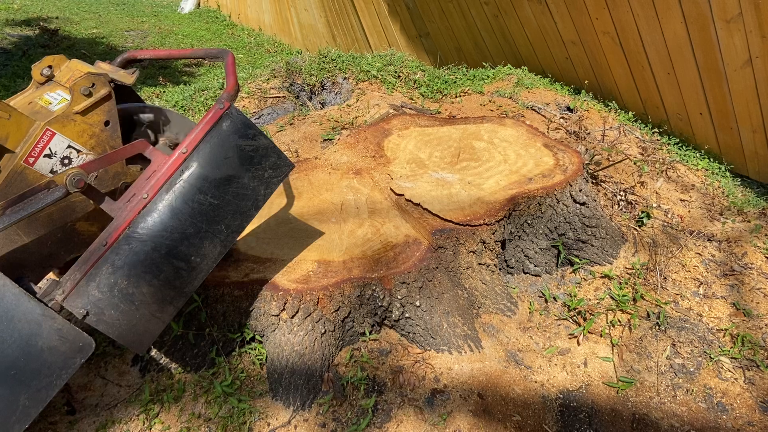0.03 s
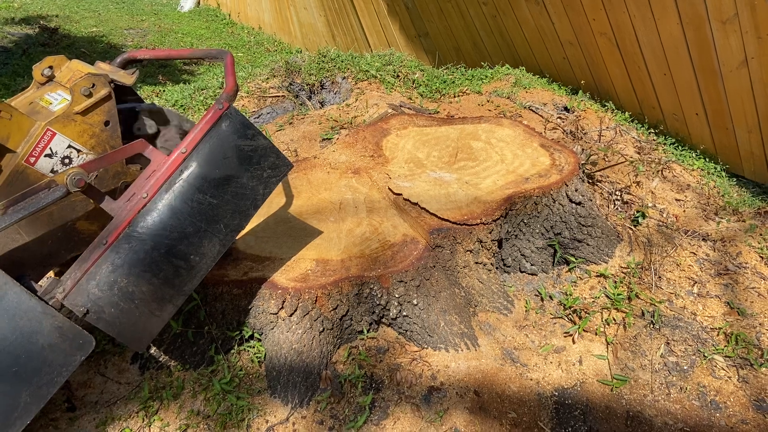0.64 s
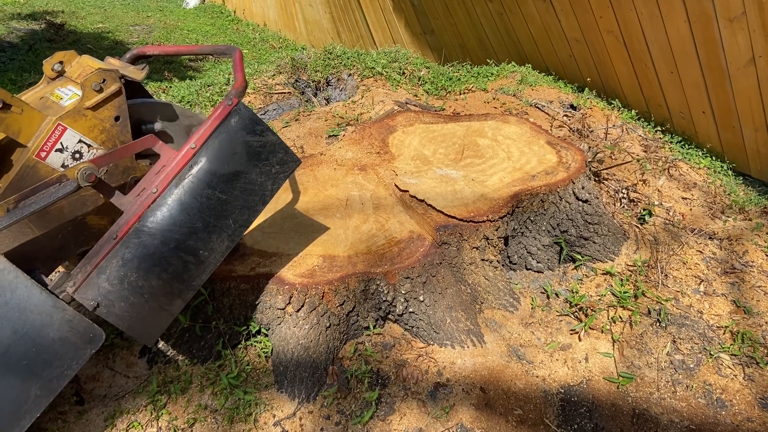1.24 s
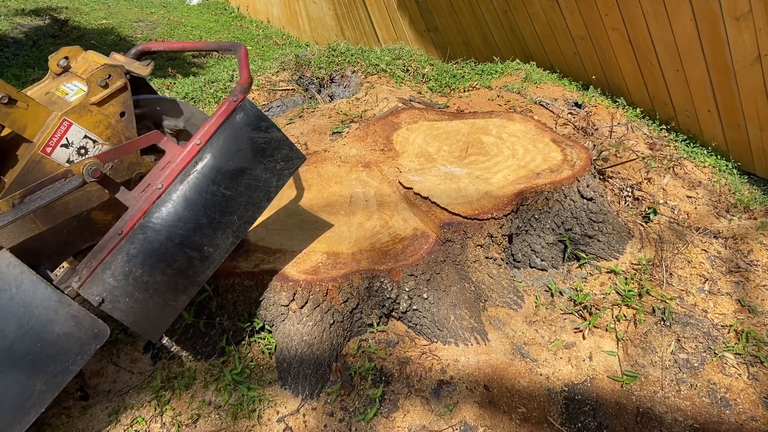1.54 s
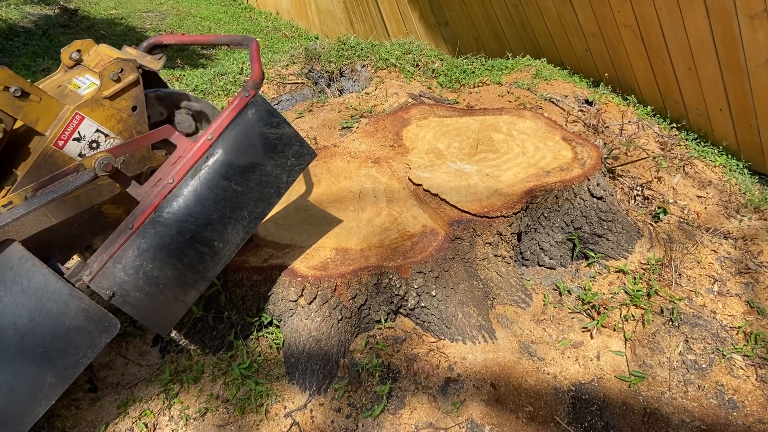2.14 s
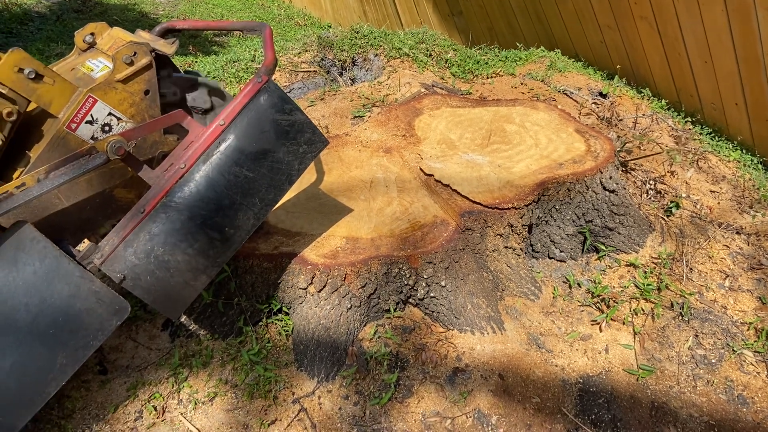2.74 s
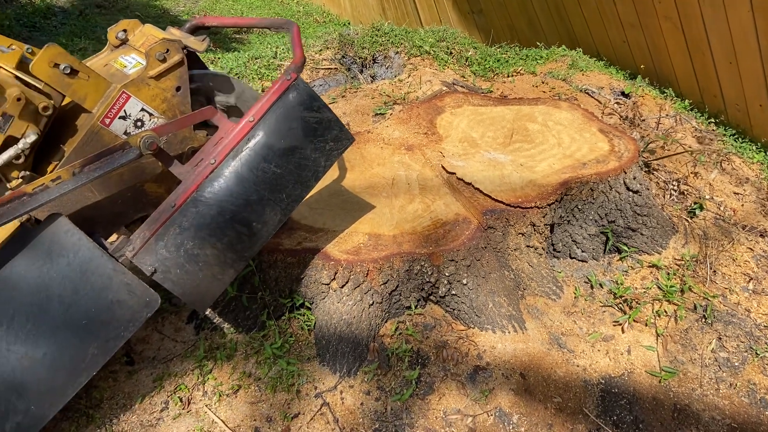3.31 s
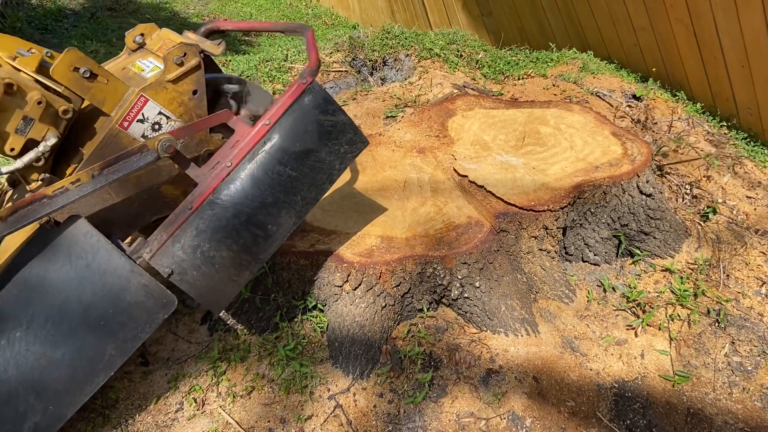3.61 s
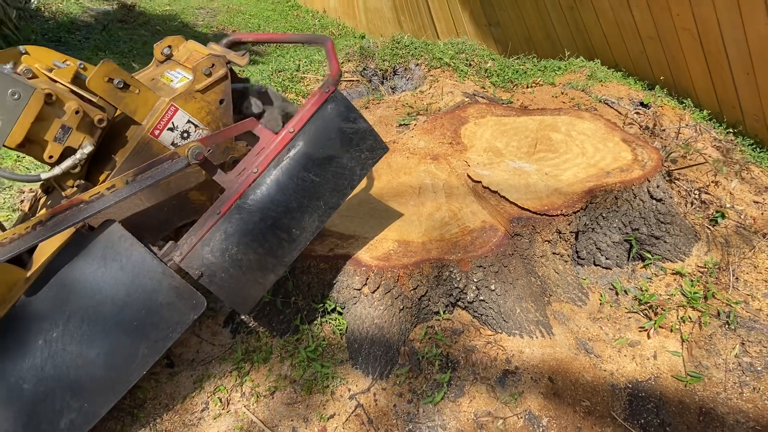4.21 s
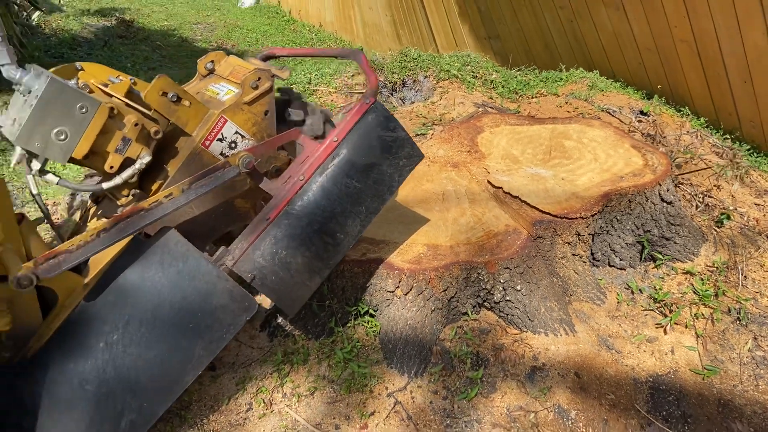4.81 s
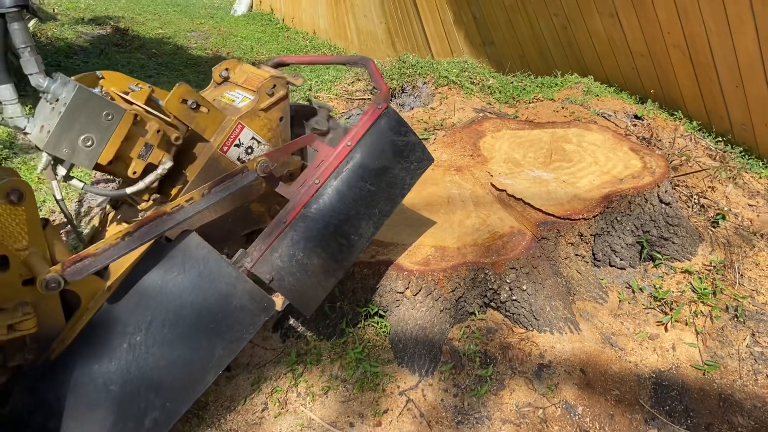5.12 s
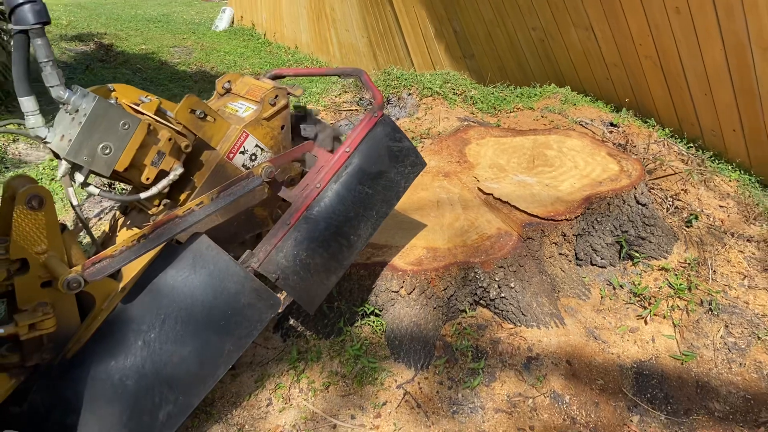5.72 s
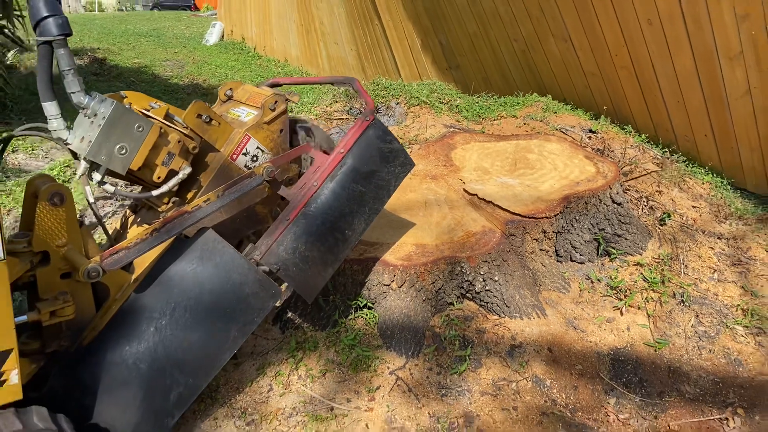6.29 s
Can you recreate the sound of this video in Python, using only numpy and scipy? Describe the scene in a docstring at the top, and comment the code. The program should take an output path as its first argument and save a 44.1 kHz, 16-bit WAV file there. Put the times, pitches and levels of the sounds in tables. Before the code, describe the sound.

A stump grinder's diesel engine idles outdoors for about six and a half seconds, holding the same speed throughout. A low exhaust drone and rumble carry a fast, even knocking that sets the metal panels ringing and buzzing. A hydraulic pump hums with a throb about three times a second, and the cooling fan adds a hum and a faint hiss. Loose fittings give short high ticks and raspy clinks, and a steel guard rings with a thin tone that swells now and then, around 1 second, between 2 and 3.6 seconds, and again near 6 seconds. The sound drops out for a tiny instant at about 2.1 seconds. From around 4 seconds the microphone is slightly closer to the machine, and the ticks and clinks become a little louder and more frequent up to the end.

```python
"""Outdoors, beside a stump grinder whose four-cylinder diesel idles at about 1000 rpm.
The exhaust drones, a nine-piston hydraulic pump hums, the fan hums and hisses, the frame rumbles.
Every firing knocks on the block and sets panels, a guard, the valve cover and loose fittings ringing.
The microphone drifts a little closer to the machine; the sound cuts out once for an instant."""
import sys
import numpy as np
from scipy import signal
from scipy.fft import rfft, irfft
from scipy.io import wavfile
from scipy.ndimage import uniform_filter1d

SR = 44100
rng = np.random.default_rng(int(sys.argv[2]) if len(sys.argv) > 2 else 0)


def transcribe(u):
    """Save the signal u as a 16-bit wav file named by the first command-line argument.

    u: samples, shape (n,) or (channels, n), limited to [-1, 1]; the rate is SR.
    q: integer samples, one column per channel.
    """
    v = np.clip(np.atleast_2d(u).T, -1, 1)
    q = np.round(v * 32767).astype(np.int16)
    wavfile.write(sys.argv[1], SR, q)


N = 288855
TIME_S = np.arange(N) / SR
BINS_HZ = np.maximum(np.arange(N // 2 + 1) * SR / N, 1)
SHAFT_HZ, FIRST_FIRING_S = 16.835, .0576

# firings of one two-turn cycle: (lateness [s], block knock [dB], valve cover kick [dB])
CYLINDERS = [(0.0009, 9, -5.5), (0.0017, 7, -3.5), (0.0023, 8.5, -8), (0.005, 7, -2.5)]


def from_db(db):
    """Decibels to gain."""
    return 10 ** (np.asarray(db) / 20)


def unit_rms(x):
    """Scale to rms 1."""
    return x / np.sqrt(np.mean(x ** 2) + 1e-20)


def at_time(points):
    """Read a table at every sample."""
    return np.interp(TIME_S, *np.transpose(points))


def at_bins(points):
    """Read a table at every FFT bin, on a log-frequency axis."""
    hz, value = np.transpose(points)
    return np.interp(np.log(BINS_HZ), np.log(hz), value)


def drift(rate_hz):
    """Low-passed noise, rms 1."""
    return unit_rms(irfft(rfft(rng.standard_normal(N)) / (1 + (BINS_HZ / rate_hz) ** 2), N))


def colour(x, spectrum):
    """Shape white excitation to a spectral density in dB."""
    return irfft(rfft(unit_rms(x)) * from_db(at_bins(spectrum)) * np.sqrt(SR / 2), N)


def decay(clicks, decay_s):
    """Exponential tail on each click."""
    return signal.lfilter([1], [1, -np.exp(-1 / (decay_s * SR))], clicks)


def walk_gain(walk_db):
    """A source changes by walk_db over the microphone's whole path; gain 1 halfway."""
    # microphone position: (time [s], share of path [0-1])
    walk = [(0, 0.6), (1.5, 0.42), (3, 0.7), (4, 0.72), (5.2, 1), (6.55, 0.98)]
    return from_db(walk_db * (at_time(walk) - .5))


def resonance(x, hz, width_hz):
    """One ringing mode, rms 1."""
    radius = np.exp(-np.pi * width_hz / SR)
    poles = [1, -2 * radius * np.cos(2 * np.pi * hz / SR), radius ** 2]
    return unit_rms(signal.lfilter([1, 0, -1], poles, x))


def ring(x, modes):
    """Parallel modes, each at its own level."""
    return sum(from_db(db) * walk_gain(walk_db) * resonance(x, hz, width_hz)
               for hz, width_hz, db, walk_db in modes)


def tones(turns, orders, waver):
    """Lines locked to a rotation; higher orders waver more in level."""
    total = np.zeros(N)
    for order, db, walk_db in orders:
        gain = from_db(db) * walk_gain(walk_db) * (1 + waver * np.sqrt(order) * drift(6.2))
        total += np.sqrt(2) * gain * np.cos(2 * np.pi * (order * turns + rng.random()))
    return total


def chatter(turns, repeat):
    """Dense small contacts, rows (direct, scattered); the share `repeat` recurs every cycle."""
    size = int(2 * SR / SHAFT_HZ)
    place_in_cycle = (turns / 2 % 1 * size).astype(int) % size
    pattern = rng.standard_normal((2, size))[:, place_in_cycle]
    return np.sqrt(repeat) * pattern + np.sqrt(1 - repeat) * rng.standard_normal((2, N))


def double_hits(start_s, level_db, spread_db, gap_s, second_db):
    """Impulse pairs of random size, the second hit gap_s after the first."""
    hits = np.zeros(N)
    for when_s, db in [(start_s, level_db), (start_s + gap_s, level_db + second_db)]:
        sample = np.clip((when_s * SR).astype(int), 0, N - 1)
        hits[sample] = from_db(db + rng.normal(0, spread_db, len(sample)))
    return hits


def blows(turns, cylinder_db, decay_s, slap_db, spread_db):
    """Force envelope: a sharp blow per firing, then the piston's slap."""
    firing = np.arange(-2, int(2 * turns[-1]) + 1)
    cylinder = firing % len(CYLINDERS)
    start_s = np.interp(firing / 2, turns, TIME_S) + np.array(CYLINDERS)[cylinder, 0]
    slap_s = .007 * rng.normal(1, .31, len(firing))
    hits = double_hits(start_s, cylinder_db[cylinder], spread_db, slap_s, slap_db)
    return np.sqrt(decay(hits ** 2, decay_s / 2) + 1e-12)   # blows add in power


def taps(turns, cylinder, spread_db, bounce_s, bounce_db):
    """One hard contact and its bounce per cycle, at the given cylinder's firing."""
    firing = np.arange(cylinder, int(2 * turns[-1]) + 1, len(CYLINDERS))
    start_s = np.interp(firing / 2, turns, TIME_S) + CYLINDERS[cylinder][0]
    gap_s = bounce_s * rng.normal(1, .28, len(firing))
    return double_hits(start_s, 0, spread_db, gap_s, bounce_db) + 1e-18


def sustained(force, floor_db):
    """Metal never rests between blows: add a floor relative to the rms force."""
    return np.sqrt(force ** 2 + np.mean(force ** 2) * from_db(floor_db) ** 2)


def cooling_air():
    """Hiss of the fan's air, roughened by turbulence."""
    # (frequency [Hz], density [dB])
    spectrum = [(100, -70), (1000, -68), (3000, -79), (6000, -85), (8000, -83.5), (11000, -82),
                (16000, -88.5)]
    grit_db = 1.2 * drift(120)
    return colour(rng.standard_normal((2, N)), spectrum) * walk_gain(1.3) * from_db(grit_db)


def fan_hum(rate_hz=91.65):
    """The belt-driven fan hums off the engine's beat."""
    # (multiple of rate, level [dB], walk [dB])
    orders = [(1, -46, 8), (2, -41, 10.4)]
    return tones(rate_hz * TIME_S, orders, waver=.25)


def frame_rumble(turns):
    """Frame and guards shake harder after each firing."""
    # (frequency [Hz], density [dB])
    spectrum = [(20, -70), (36, -67), (55, -50), (105, -46.5), (150, -53.5), (200, -51.5), (260, -48.5),
                (330, -48.5), (410, -53.5), (520, -52.5), (650, -50.5), (790, -52.5), (950, -58.5),
                (1400, -55), (3000, -144)]
    push = 1 + .1 * np.cos(2 * np.pi * (2 * turns - .23))
    gain = from_db(-2 + drift(12)) * walk_gain(1.5)
    return gain * colour(chatter(turns, repeat=.18) * push, spectrum)


def noise_swells(turns):
    """Narrow bands of noise swell and fade, from low rumble to brief high zings."""
    # (time [s], half length [s], frequency [Hz], width [Hz], level [dB])
    swells = [(0.357, 0.055, 4700, 240, -37.5), (0.629, .006, 800, 400, -25),
              (1.277, 0.067, 372, 70, -25.5), (3.854, 0.81, 243, 50.6, -27.5),
              (4.298, 0.2, 2315, 45, -35.5), (4.9, 0.56, 206, 50, -36.5), (5.235, 0.027, 4750, 350, -33),
              (5.35, 0.36, 105, 35, -29.5), (5.42, 0.18, 4840, 200, -46), (6.1, 0.77, 1030, 200, -40),
              (6.268, 0.19, 260, 200, -35)]
    noise = chatter(turns, repeat=.1)
    return sum(from_db(db) * np.exp(-((TIME_S - at_s) / half_s) ** 2) * resonance(noise, hz, width_hz)
               for at_s, half_s, hz, width_hz, db in swells)


def fitting_ticks(decay_s=.018):
    """A fitting is thrown against its seat: one short rough ring each time."""
    # (time [s], frequency [Hz], level [dB])
    ticks = [(.713, 5000, -34), (1.247, 5540, -43), (1.545, 4900, -39), (2.018, 4410, -38),
             (2.258, 4830, -34), (2.376, 4900, -32), (2.497, 4770, -34), (2.565, 4850, -38),
             (3.327, 4900, -36), (3.662, 4850, -33), (4.635, 4900, -30), (4.871, 4850, -34),
             (4.99, 4850, -35), (5.196, 4650, -35), (5.347, 4800, -34), (5.434, 5000, -31),
             (5.467, 4900, -32), (5.522, 4870, -33), (5.585, 4860, -34), (5.7345, 4600, -32),
             (5.824, 4850, -37), (6.18, 4870, -31), (6.327, 4700, -36), (6.415, 4850, -31)]
    contact = rng.standard_normal((2, N))
    total = np.zeros((2, N))
    for at_s, hz, db in ticks:
        envelope = (TIME_S >= at_s) * np.exp(-np.minimum(abs(TIME_S - at_s) / decay_s, 20))
        total += from_db(db) * envelope * resonance(contact, hz, width_hz=150)
    return total


def fitting_jingle(force, touches_per_s=160, spread_db=1):
    """Loose fittings touch at random, most often just after a knock."""
    # (frequency [Hz], width [Hz], level [dB], walk [dB])
    modes = [(4240, 67, -47.5, -8), (4500, 35, -49, 0), (4730, 29, -51, 6), (4854, 31, -47, 4),
             (5100, 91, -48, 1)]
    touches = rng.random(N) < touches_per_s / SR * force ** 2 / np.mean(force ** 2)
    sizes = from_db(spread_db * rng.standard_normal(N))
    contacts = touches * sizes * rng.choice([-1, 1], (2, N)) + 1e-18
    soften = signal.butter(4, 6000, fs=SR, output="sos")
    return ring(signal.sosfilt(soften, contacts), modes)


def tappet(turns):
    """A tappet ticks once a cycle, on the third firing."""
    # (frequency [Hz], width [Hz], level [dB], walk [dB])
    modes = [(2420, 90, -49, 0), (2550, 70, -45.5, 0), (2665, 80, -48.5, 0)]
    # the tick comes and goes: (time [s], gain [dB])
    gain_db = [(0, 0), (.9, 0), (1.1, -4), (2.1, -4), (2.5, -1), (3.2, -1), (3.45, -8), (4.15, -8),
               (4.3, 1), (4.8, 1), (5.05, -7), (5.4, 2), (5.8, 0), (6.3, -7)]
    strikes = taps(turns, cylinder=2, spread_db=.7, bounce_s=.004, bounce_db=0)
    contact = chatter(turns, repeat=.22) * decay(strikes, decay_s=.006)
    return ring(contact, modes) * from_db(at_time(gain_db))


def valve_snaps(turns, spread_db=2.5):
    """Injectors and valves crack shut at the same points of every cycle."""
    # (delay in cycle [s], level [dB])
    closings = [(.0005, 0), (.014, -4), (.0318, -3), (.041, -5), (.062, -5), (.067, -3), (.08, -6),
                (.09, -5)]
    # (frequency [Hz], density [dB])
    spectrum = [(400, -93), (1050, -65), (1500, -59.5), (1900, -68), (2600, -79.5), (5000, -86),
                (7000, -114), (11000, -84), (16000, -111)]
    cycle_s = np.interp(np.arange(0, turns[-1], 2), turns, TIME_S)
    clicks = np.zeros(N + SR)
    for delay_s, db in closings:
        sample = ((cycle_s + delay_s) * SR).astype(int)
        clicks[sample] = from_db(rng.normal(db, spread_db, len(sample)))
    envelope = decay(clicks[:N] + 1e-18, decay_s=.003)
    return colour(chatter(turns, repeat=.53) * envelope, spectrum)


def cover_buzz(turns):
    """All four cylinders keep the valve cover buzzing."""
    # (frequency [Hz], width [Hz], level [dB], walk [dB])
    modes = [(3226, 13, -46, 2), (3322, 6.3, -43, -1), (3466, 42, -53.5, 11)]
    force = blows(turns, np.array(CYLINDERS)[:, 2], decay_s=.011, slap_db=-1, spread_db=.6)
    return ring(chatter(turns, repeat=.55) * sustained(force, floor_db=-9), modes)


def cover_clink(turns, rise_s=.004, spread_hz=85):
    """The first cylinder rattles the valve cover in a short raspy clink."""
    # (time [s], level [dB], centre [Hz])
    clink = [(0, -38, 3290), (.18, -39, 3290), (.3, -33, 3290), (.42, -32, 3290), (.53, -39, 3290),
             (.72, -33, 3290), (.9, -38, 3290), (1.13, -36.5, 3290), (1.28, -32, 3310), (1.6, -33.5, 3300),
             (2.45, -36, 3280), (2.8, -32, 3290), (3.3, -32.5, 3280), (4.3, -30, 3370), (4.7, -28.5, 3340),
             (4.85, -30.5, 3280), (5.3, -28.5, 3290), (5.5, -30, 3290), (5.8, -28, 3310),
             (6.1, -28.5, 3330), (6.26, -30, 3465), (6.5, -27.5, 3450)]
    at_s, level_db, centre_hz = np.transpose(clink)
    strikes = taps(turns, cylinder=0, spread_db=.5, bounce_s=.008, bounce_db=-1)
    envelope = decay(decay(strikes, rise_s), rise_s) * np.e / (rise_s * SR)   # unit hit peaks at 1
    pitch_hz = np.interp(TIME_S, at_s, centre_hz) + spread_hz * drift(157)
    rasp = np.sqrt(2) * np.sin(2 * np.pi * np.cumsum(pitch_hz) / SR) * (.8 + .35 * drift(300))
    return rasp * envelope * from_db(np.interp(TIME_S, at_s, level_db))


def steel_guard(knock, even_s=.025, flutter_db=2):
    """A lightly damped plate, kept ringing by the knocks, swells now and then."""
    # (time [s], half length [s], gain [dB])
    swells = [(1.01, 0.035, 6), (1.897, .06, 8), (2.223, 0.054, 6.5), (2.395, .05, -2), (2.6, 0.07, 5),
              (2.797, 0.054, 6), (2.98, 0.055, 1), (3.16, .07, 4.5), (3.337, .05, 7), (3.586, 0.064, 8),
              (5.167, 0.044, 0), (5.423, 0.093, 1), (6.008, 0.038, 11.5), (6.18, 0.038, 8)]
    tone = resonance(knock, hz=2097, width_hz=28)
    power = uniform_filter1d(tone ** 2, size=int(even_s * SR))
    even_tone = tone / np.sqrt(power + .21)
    swell_db = sum(db * np.exp(-((TIME_S - at_s) / half_s) ** 2) for at_s, half_s, db in swells)
    return even_tone * from_db(-38 + swell_db + flutter_db * drift(19)) * walk_gain(1.5)


def hydraulic_pump(turns):
    """Nine pistons: a fundamental throbbing about three times a second, and wavering overtones."""
    # fundamental: (time [s], level [dB])
    throb_db = [(0.05, -33), (0.14, -28.5), (0.35, -34), (0.5, -26), (0.6, -49), (0.73, -26), (0.84, -35),
                (0.91, -45), (0.97, -36), (1.05, -29.5), (1.23, -36), (1.27, -32), (2.29, -30.5),
                (2.42, -28), (2.54, -40), (2.67, -27), (2.83, -33), (3.0, -27), (3.1, -32.5), (3.23, -28.5),
                (3.84, -32), (3.88, -42), (3.97, -27.5), (4.07, -32), (4.13, -38), (4.33, -26.5),
                (4.45, -40), (4.56, -28), (4.81, -30), (4.86, -43), (4.9, -42), (5.04, -23.5), (5.11, -35),
                (5.31, -29), (5.92, -30.5), (6.07, -27), (6.25, -36), (6.34, -28), (6.46, -29), (6.5, -39)]
    # (multiple of piston rate, level [dB], walk [dB])
    overtones = [(3, -48, 28.5), (4, -38, 6), (5, -35, 2.5)]
    strokes = 9 * turns
    fundamental = np.sqrt(2) * from_db(at_time(throb_db) + .5) * np.cos(2 * np.pi * strokes)
    return fundamental + tones(strokes, overtones, waver=.1)


def engine_drone(turns):
    """Exhaust, block and timing gears drone at orders of the crankshaft."""
    # both: (multiple of shaft speed, level [dB], walk [dB])
    exhaust = [(2, -38.5, -7), (3.5, -50.5, 10), (4, -21.5, -0.5), (4.5, -47, 6), (6, -36, 13),
               (10.5, -44.5, 0), (12, -42.5, 14), (14.5, -45.5, 12), (15, -41.5, 0), (16, -37.5, -9),
               (18, -51, 26), (23, -43, -9), (24, -39.5, -5), (30, -40, 8)]
    gears = [(38, -42, 2), (39, -43, 0), (46, -43, 0), (56, -48.5, 6), (62, -50, 6), (68, -50, 8),
             (92, -49, 2), (96.5, -48, 2)]
    return tones(turns, exhaust + gears, waver=.031)


def diesel_clatter(turns):
    """Combustion knocks on the block and rings panels, guard and fittings; valves snap along."""
    # block: (frequency [Hz], density [dB])
    spectrum = [(300, -109), (700, -59.5), (1050, -61), (1300, -62.5), (1560, -54), (1900, -65),
                (2550, -71.5), (3000, -68.5), (3900, -72.5), (5000, -72), (6200, -73.5), (7700, -82),
                (10500, -104.5), (16000, -88)]
    # manifold and sheet metal: (frequency [Hz], width [Hz], level [dB], walk [dB])
    panels = [(1360, 47, -39, -5), (1675, 6.9, -58, -1), (1807, 100, -45.5, 2), (2308, 23, -44.5, 6),
              (2473, 90, -44, 7), (2784, 20, -51, 14)]
    # at the microphone: (time [s], gain [dB])
    gain_db = [(0, -4), (1.1, -2.1), (2.8, -1.5), (4.1, -1.5), (5.4, -0.6), (6.55, -2)]
    force = blows(turns, np.array(CYLINDERS)[:, 1], decay_s=.017, slap_db=-2, spread_db=1.1)
    knock = chatter(turns, repeat=.4) * sustained(force, floor_db=-1)
    guard = steel_guard(knock) * unit_rms(force ** .2)   # follows each knock weakly
    metal = colour(knock, spectrum) + ring(knock, panels) + guard + fitting_jingle(force)
    return from_db(at_time(gain_db)) * (metal + valve_snaps(turns))


def microphone_ports(direct, scattered):
    """Direct sound reaches the left port first; scattered sound differs between the ports."""
    # (frequency [Hz], left lead [rad])
    lead_rad = [(60, 0.14), (300, 0.63), (600, 1.42), (1000, 1.79), (1400, 3.5), (1800, 4), (2300, 6.9),
                (3300, 7.1), (4400, 6), (5100, 6.7), (6300, 6.2), (16000, 6.2)]
    # (frequency [Hz], left-right coherence [0-1])
    coherence = [(60, .96), (150, .9), (350, .88), (1400, .82), (2200, .75), (3200, .75), (4200, .4),
                 (5400, .25), (7000, .55), (9000, .15), (15000, .1)]
    # (frequency [Hz], left minus right [dB])
    balance_db = [(60, -1.5), (92, 0.5), (140, -1), (210, 0), (330, -0.5), (500, 3), (770, 5.5), (1170, -3),
                  (1790, -5.5), (2740, 0), (4190, -1), (6410, 0), (9810, -0.5), (15000, 0.5)]
    alike = at_bins(coherence)
    mid = rfft(direct) * np.sqrt((1 + alike) / 2)
    side = rfft(scattered) * np.sqrt((1 - alike) / 2)
    sign = np.array([[1], [-1]])
    pair = (mid + sign * side) * from_db(sign * at_bins(balance_db) / 2)
    pair[1] *= np.exp(-1j * at_bins(lead_rad))
    return irfft(pair, N)


def scene():
    """The idling machine in stereo; one crankshaft times engine and pump."""
    turns = SHAFT_HZ * (TIME_S - FIRST_FIRING_S) + .002 * drift(1.1)   # the governor hunts slightly
    hum = engine_drone(turns) + hydraulic_pump(turns) + fan_hum()
    background = cooling_air() + frame_rumble(turns) + noise_swells(turns)
    rattles = fitting_ticks() + tappet(turns) + cover_buzz(turns) + cover_clink(turns)
    direct, scattered = background + rattles + diesel_clatter(turns)
    return microphone_ports(direct + hum, scattered)


def record(dry, cutoff_hz=15900):
    """The sound starts after an instant of silence and drops out once; the top is cut."""
    # (start [s], end [s])
    silences = [(-.01, .036), (2.1035, 2.1245)]
    live = np.ones(N)
    for start_s, end_s in silences:
        live[(TIME_S > start_s) & (TIME_S < end_s)] = 0
    low_pass = signal.ellip(10, .1, 90, cutoff_hz, fs=SR, output="sos")
    return signal.sosfilt(low_pass, dry * uniform_filter1d(live, size=30))


dry = scene()
out = record(dry)
transcribe(out)
```